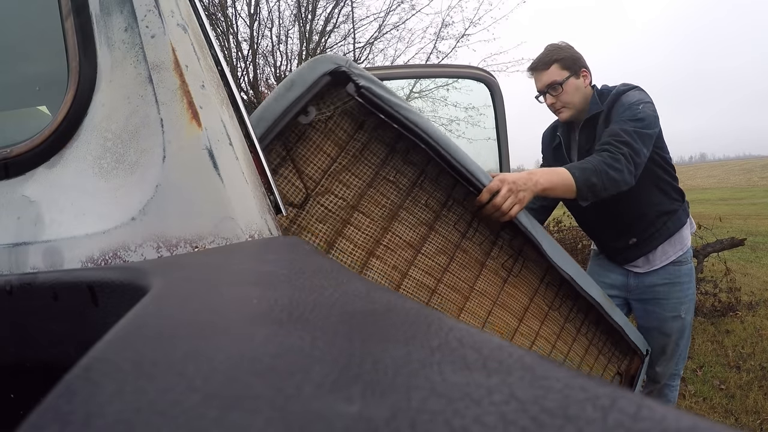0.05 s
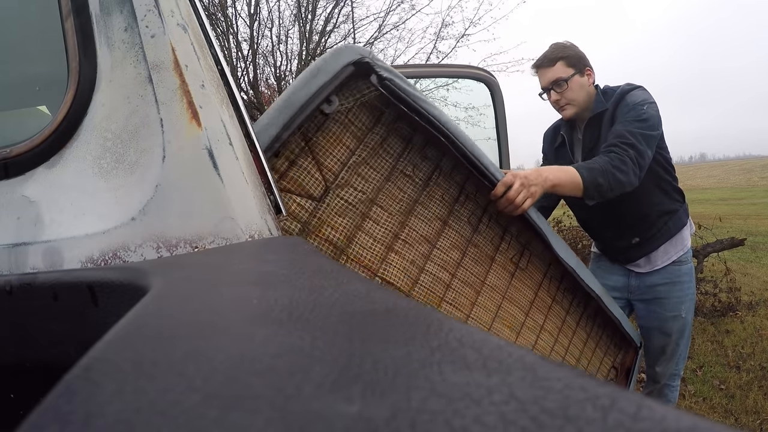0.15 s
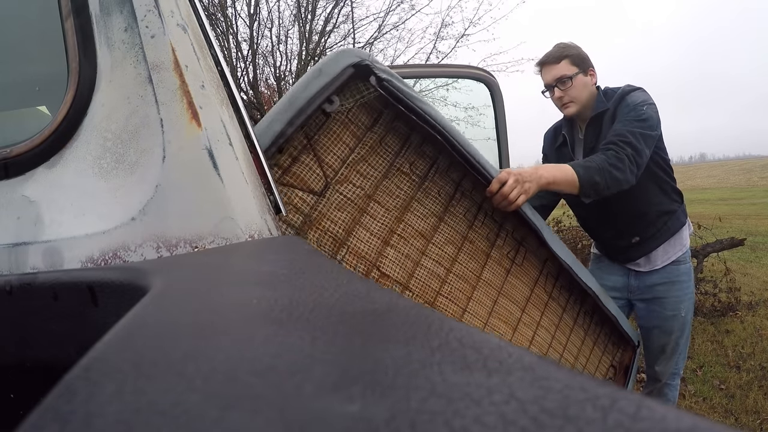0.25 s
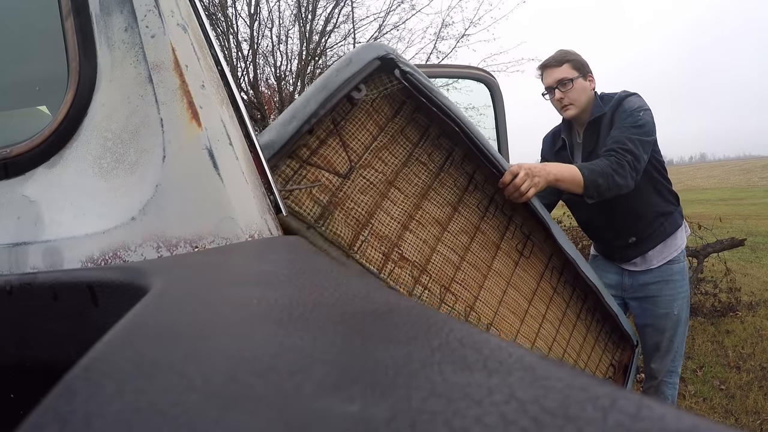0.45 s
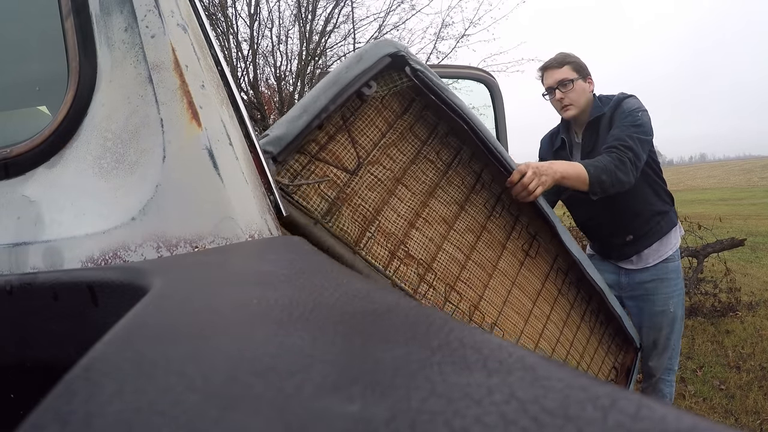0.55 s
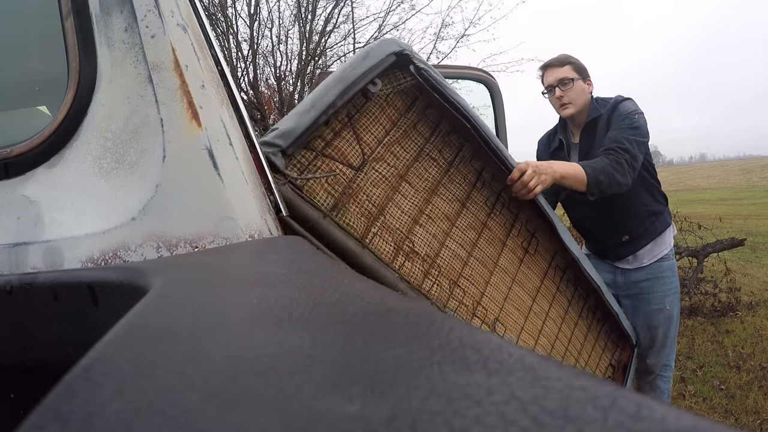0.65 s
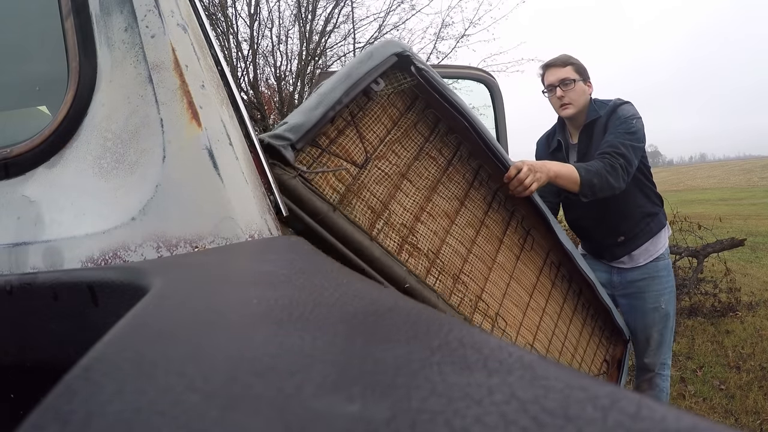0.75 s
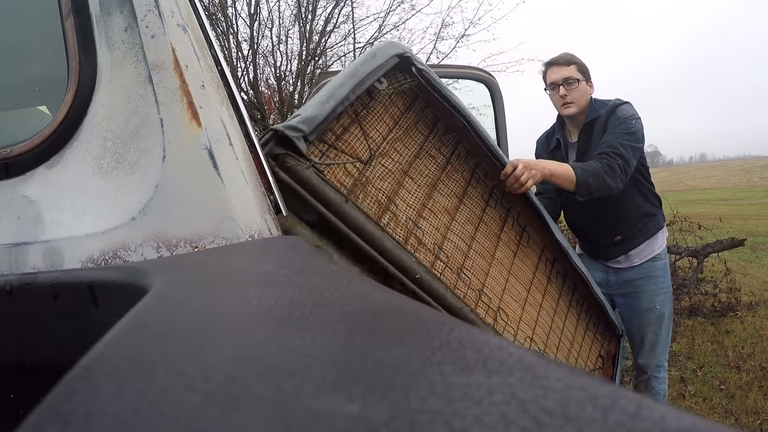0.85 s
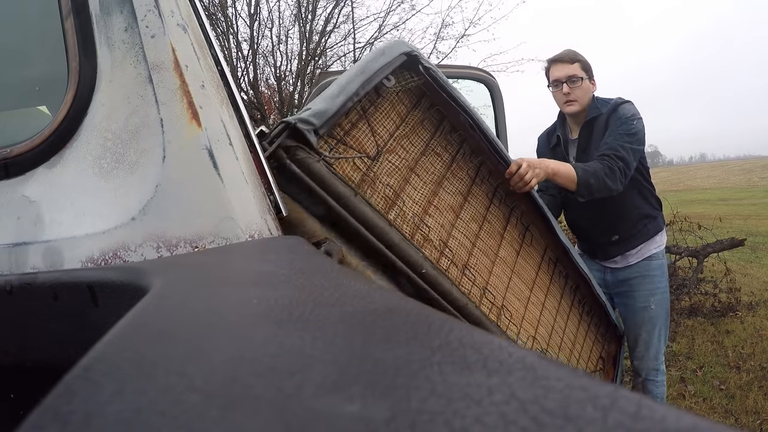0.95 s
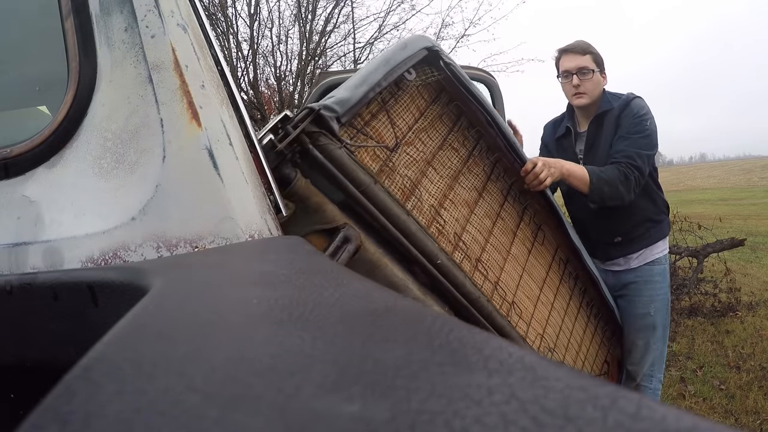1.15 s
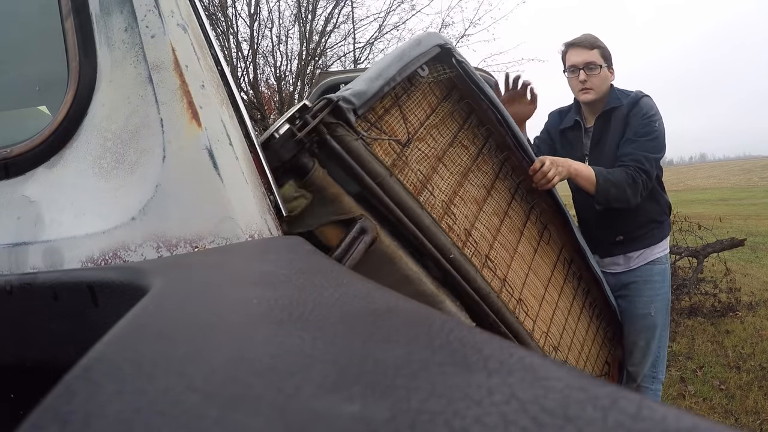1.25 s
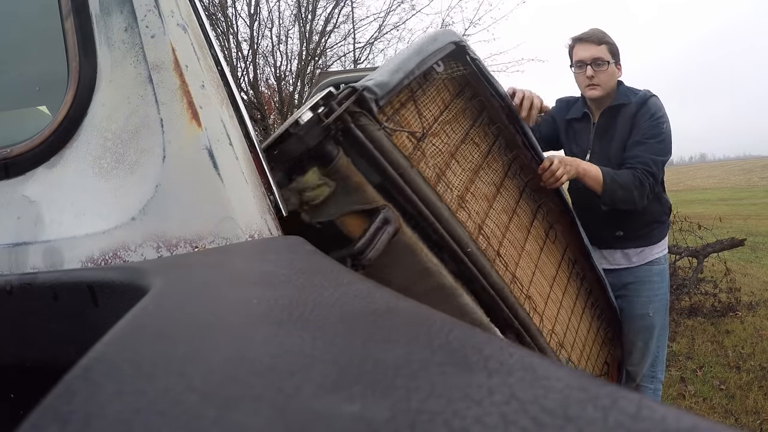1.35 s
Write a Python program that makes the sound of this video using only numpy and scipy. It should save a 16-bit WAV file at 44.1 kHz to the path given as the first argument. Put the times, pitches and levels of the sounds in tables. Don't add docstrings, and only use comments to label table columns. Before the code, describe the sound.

A heavy seat frame thumps hard onto a steel vehicle sill, then knocks and rattles loosely

```python
import sys
import numpy as np
from scipy import signal
from scipy.fft import rfft, irfft
from scipy.io import wavfile
from scipy.ndimage import uniform_filter1d

SR = 44100
rng = np.random.default_rng(int(sys.argv[2]) if len(sys.argv) > 2 else 0)


def dump_mix(stems):
    frames = np.atleast_2d(stems).T
    limited = np.clip(frames, -1, 1)
    pcm = np.round(limited * 32767).astype(np.int16)
    wavfile.write(sys.argv[1], SR, pcm)


def invert_db(x):
    u = np.asarray(x, float) / 20
    return 10 ** u


N = 61739

# (frequency [Hz], density [dB per Hz])
HISS_SPECTRUM = [(53, -21), (90, -11.5), (314, -21), (398, -23), (864, -23.5), (1270, -22.5), (1650, -26),
                 (2090, -24), (15500, -41)]
# (time [s], level [dB])
SHAKE_LEVEL = [(0, -40), (.1, -46.5), (.19, -50), (.23, -23), (.36, -24.5), (.47, -29.5), (.6, -25),
               (.69, -27), (.74, -30), (.85, -28.5), (.92, -32.5), (1.0, -32), (1.09, -31), (1.13, -31),
               (1.2, -35.5), (1.4, -39)]
# (frequency [Hz], width [Hz], level [dB])
WOBBLE_MODES = [(25.2, 12, 1.5), (44.3, 34, -4), (61.4, 29, 3), (88, 15, -14)]
# (frequency [Hz], density [dB per Hz])
GROAN_SPECTRUM = [(53, -42), (90, 4), (679, -23), (1090, -31), (1520, -40.5), (3420, -47), (4150, -51.5),
                  (6000, -51), (7800, -103.5), (13200, -120)]
# (peak time [s], rise [s], fall [s], level [dB], centre [Hz])
SCRAPES = [
    (.6, 0.041, 0.029, -48, 1070),
    (1.139, 0.039, 0.021, -55, 3470),
]
# (time [s], level [dB], pitch [Hz], decay t60 [s])
FITTINGS = [(0.066, -56.5, 1780, 0.034), (.345, -51, 10500, 0.025), (.391, -42, 2160, 0.019),
            (.407, -40, 2250, 0.023), (.4105, -40, 1680, 0.019), (0.4203, -37, 2300, 0.013),
            (0.422, -42, 1800, 0.024), (.433, -49, 2400, 0.044), (.44, -43, 1680, 0.03),
            (.449, -60, 1570, 0.034), (.478, -44, 1940, 0.048), (0.487, -37.5, 1560, 0.035),
            (.499, -45, 2110, 0.067), (0.508, -44, 1500, 0.037), (0.518, -43, 2250, 0.031),
            (0.537, -42, 1550, 0.083), (.583, -45, 12500, .04), (0.636, -39, 1120, 0.078),
            (.6515, -49, 9400, .04), (.652, -37.5, 3550, 0.096), (.709, -40, 1140, 0.037),
            (.736, -47, 12200, .03), (0.814, -50, 6000, 0.079), (.822, -51, 12000, .03),
            (.826, -39, 3340, 0.028), (0.907, -58, 1920, 0.036), (0.941, -40, 4300, .06),
            (.978, -55, 4800, 0.038), (.998, -32, 380, 0.033), (.7025, -44, 2870, 0.034)]
# (time [s], level [dB], colour [Hz], decay t60 [s], brightness [dB per octave])
METAL_CRACKS = [(.0024, -40, 5400, 0.029, 13.5), (.345, -45, 6000, 0.045, -4), (0.407, -49, 2300, 0.052, 5),
                (.420, -52, 2320, 0.056, 7), (0.436, -43.5, 1610, 0.069, 0.5),
                (.478, -49.5, 1540, 0.32, 1.5), (0.498, -55, 2210, 0.11, 6), (0.535, -49, 1410, 0.53, -1),
                (0.5648, -32.5, 1670, 0.079, -1), (0.583, -34.5, 2520, 0.13, 0),
                (0.603, -42.5, 2360, 0.34, -3), (0.631, -40, 3300, 0.13, 2), (0.6519, -46, 3400, 0.19, 10),
                (0.7068, -49, 2280, 0.2, 2), (0.7351, -44, 5860, 0.15, 3.5), (0.821, -38, 2420, 0.18, 1),
                (.835, -45, 3220, 0.068, -15), (.942, -35, 4290, 0.12, 6), (0.957, -38, 2170, 0.19, 2),
                (0.9756, -33, 2220, 0.16, 1), (1.001, -48, 1510, 0.43, -7), (1.056, -51, 1850, 0.27, -3.5),
                (1.108, -56, 1520, .1, 7), (1.1462, -42, 937, 0.04, -2)]
# (time [s], level [dB], colour [Hz])
LOOSE_CLACKS = [
    (0.208, -17, 2620),
    (0.213, -39, 2390),
    (0.2208, -20, 2860),
    (0.2391, -42, 2980),
    (0.245, -29.5, 11000),
    (.265, -10.5, 3180),
    (0.2692, -29.5, 10900),
    (0.285, -29, 7800),
    (0.304, -29, 10900),
    (0.305, -21.5, 5750),
]
# (time [s], level [dB], strongest pitch [Hz], contact [s])
DULL_BLOWS = [(.312, -21.5, 226, 0.035), (0.337, -23.5, 300, 0.004), (0.411, -32.5, 246, 0.018),
              (0.445, -29, 247, 0.012), (0.487, -37.5, 483, 0.04), (0.535, -28, 398, 0.06),
              (0.568, -21, 300, 0.046), (0.586, -28.5, 614, 0.027), (0.605, -22, 300, 0.041),
              (.632, -47, 484, 0.023), (0.704, -36.5, 367, 0.042), (0.739, -42, 690, 0.078),
              (0.82, -29.5, 353, 0.038), (.943, -19, 660, 0.014), (.955, -19.5, 640, 0.014),
              (.96, -21.5, 225, 0.032), (0.996, -31.5, 225, 0.04), (1.0, -31.5, 715, 0.0067)]
# (time [s], level [dB])
RATTLE_LEVEL = [(.203, -46), (.208, -25), (.225, -20.5), (.25, -24.5), (.265, -29.5), (.304, -31),
                (.312, -35), (.35, -43), (.39, -69)]
# (frequency [Hz], density [dB per Hz])
RATTLE_SPECTRUM = [(180, -4), (300, 2), (461, -12.5), (781, -6), (1220, -9.5), (1490, -6.5), (3130, -15.5),
                   (11000, -41.5), (15500, -53)]
# (frequency [Hz], density [dB per Hz])
CRACK_SPECTRUM = [(400, 6.5), (900, -0.5), (1700, -0.5), (3000, -7), (5000, -14.5), (8000, -28.5),
                  (12500, -44.5), (15600, -48)]
# (frequency [Hz], level [dB], decay t60 [s])
FRAME_MODES = [(273, -8, 0.23), (361, 1, 0.28), (794.5, 2, 0.31), (1055, -2, 0.4), (1446, -12, .35),
               (1525, -7, 0.39), (1892, -5.5, 0.15), (2246, -8, .3), (2820, -10, 0.18)]
# (frequency [Hz], level [dB], decay t60 [s])
PANEL_MODES = [(159.4, -6.5, 0.27), (225, 0, 0.1), (225, 0.5, 0.18), (300, -34.5, 0.48), (387.5, -7, 0.09),
               (500, -9, 0.033), (622, -4.5, 0.04), (686.3, 5, .11), (842, -12, 0.3), (977.4, -2.5, 0.18),
               (1110, -3, 0.1), (1296, -17, 0.11), (1810, -31, 0.09), (2050, -33, 0.14)]
# (time [s], level [dB], frequency [Hz], decay t60 [s], rise [s])
SHELL_SWINGS = [(0.2079, -8, 65.26, 0.46, 0.022), (0.2141, 4.4, 36.4, 0.18, 0.019),
                (0.2738, -1, 53.3, 0.089, 0.023), (0.3102, -17.5, 85.6, 0.37, 0.025),
                (0.349, -28.5, 87.6, 0.58, 0.008), (0.3553, -17.5, 39.3, 0.39, 0.0074),
                (0.435, -11, 67, 0.29, 0.078), (0.4398, -17.5, 33.7, 0.86, 0.096),
                (0.5285, -20, 71.2, 0.42, 0.0045), (0.5388, -24.5, 37.5, 0.33, 0.018),
                (0.5777, -22, 83.5, 0.45, 0.0041), (0.602, 4, 53.1, 0.17, 0.08),
                (0.6502, -13, 90, 0.14, 0.038), (0.7072, -21, 85.7, 0.45, 0.079),
                (0.7823, -39, 30.8, 0.4, 0.008), (0.783, -16.5, 55.5, 0.5, 0.08),
                (0.838, -19.5, 65.2, 0.4, 0.04), (0.8914, -29, 50.6, 0.29, 0.0093),
                (0.919, -16.5, 67.5, 0.3, 0.073), (0.9487, -14.5, 35.2, 0.38, 0.025),
                (1.0111, -8, 55.5, 0.28, 0.068), (1.08, -23, 62.1, 0.39, 0.02),
                (1.1652, -17, 86.1, 0.12, 0.057), (1.2169, -22.5, 62.5, 0.35, 0.064),
                (1.232, -29, 31.2, 0.75, 0.11), (1.2872, -27.5, 54.5, 0.36, 0.092)]
# (time [s], level [dB], strongest pitch [Hz])
LANDINGS = [
    (0.2034, -13, 770),
    (.208, -1.5, 500),
    (.2126, -13, 620),
    (.2172, -19.5, 600),
    (0.2212, -10.5, 300),
    (0.9435, -29, 800),
    (1.1458, -43.5, 1000),
]


def evened(x):
    return x / np.sqrt(np.mean(x ** 2) + 1e-20)


def curve(rows, outside_db):
    s, db = np.transpose(rows)
    return np.interp(np.arange(N) / SR, s, db, outside_db, outside_db)


def colour(x, points):
    f, db = np.transpose(points)
    hz = np.fft.rfftfreq(len(x), 1 / SR) + 1
    gain = invert_db(np.interp(np.log(hz), np.log(f), db, -70, -70))
    return irfft(rfft(x) * gain, len(x))


def add(mix, s, sound):
    part = mix[round(s * SR):][:len(sound)]
    part += sound[:len(part)]


def resonate(x, hz, width_hz):
    r = np.exp(-np.pi * width_hz / SR)
    return 2 * signal.lfilter([1 - r], [1, -r * np.exp(2j * np.pi * hz / SR)], x).real


def resonate_twice(x, hz, width_hz):
    return resonate(resonate(x, hz, width_hz), hz, width_hz)


def roughness(swing_db, samples):
    noise = rng.standard_normal(N)
    return invert_db(swing_db * evened(uniform_filter1d(noise, samples)))


def frame(force):
    t = np.arange(int(.5 * SR)) / SR
    ring = sum(invert_db(db - 60 * t / t60) * np.sin(2 * np.pi * hz * t) for hz, db, t60 in FRAME_MODES)
    return signal.fftconvolve(force, ring)[:N]


def panel(force, shorten, centre_hz, width_oct, detune=0):
    t = np.arange(int(.4 * SR)) / SR
    ring = np.zeros(len(t))
    shift = 1 + detune * rng.standard_normal(len(PANEL_MODES))
    for (hz, db, t60), k in zip(PANEL_MODES, shift):
        coupling_db = -4.4 * (np.log2(hz / centre_hz) / width_oct) ** 2
        decay_db = -60 * t / (t60 * shorten)
        ring += invert_db(db + coupling_db + decay_db) * np.sin(2 * np.pi * hz * k * t)
    return signal.fftconvolve(force, ring)


def hiss():
    duck_db, recover_s = -8, 0.42
    t = np.arange(N) / SR - LANDINGS[0][0]
    gain_db = duck_db * (t > 0) * np.exp(-(np.abs(t) / recover_s) ** 2)
    return invert_db(-59.5 + gain_db) * evened(colour(rng.standard_normal(N), HISS_SPECTRUM))


def shaking():
    rest_db, wobble_follow = -52.5, 0.57
    groan_db, groan_follow = -44.5, 1.795
    level_db = curve(SHAKE_LEVEL, -50)
    low = np.zeros(N)
    for hz, width_hz, db in WOBBLE_MODES:
        low += invert_db(db) * evened(resonate_twice(rng.standard_normal(N), hz, width_hz))
    groan = evened(colour(rng.standard_normal(N) * roughness(1, 500), GROAN_SPECTRUM))
    wobble = invert_db(rest_db + wobble_follow * (level_db - rest_db)) * evened(low)
    return wobble + invert_db(groan_db + groan_follow * (level_db + 33.5)) * groan


def brush():
    out = np.zeros(N)
    for s, rise_s, fall_s, db, hz in SCRAPES:
        t = np.arange(N) / SR - s
        swell = np.exp(-np.where(t < 0, -t / rise_s, t / fall_s))
        fuzz = rng.standard_normal(N) * roughness(1.7, 90)
        out += invert_db(db) * swell * evened(resonate(resonate(fuzz, hz, 1.2 * hz), hz, 3 * hz))
    return out


def sizzle():
    start_s, end_s, fade_s, hz = .206, 0.3004, 0.0086, 5360
    t = np.arange(N) / SR
    gate = (t > start_s) * np.exp(-np.maximum(t - end_s, 0) / fade_s)
    grit = rng.standard_normal(N) * roughness(2.5, 120)
    return invert_db(-43.5) * gate * evened(resonate(grit, hz, .9 * hz))


def clatter():
    out, t = np.zeros(N), np.arange(int(.1 * SR)) / SR
    for s, db, hz, t60 in FITTINGS:
        noise = rng.standard_normal(len(t))
        force = 10 * (t == 0) + noise * invert_db(-60 * t / t60)
        puff = resonate_twice(force, hz, 0.2 * hz)
        add(out, s, invert_db(db) * puff / np.abs(puff).max())
    return out


def crack(hz, t60, tilt_db, ring_db, width):
    t = np.arange(int(.25 * SR)) / SR
    noise = rng.standard_normal((3, len(t)))
    tone = [(f, db + tilt_db * np.log2(f / 2000)) for f, db in CRACK_SPECTRUM]
    broad = evened(colour(noise[0], tone))
    ring = invert_db(ring_db) * evened(resonate_twice(noise[1], hz, width * hz))
    chatter = invert_db(2.2 * evened(uniform_filter1d(noise[2], 70)))
    snap = (broad + ring) * invert_db(-60 * t / (.36 * t60)) * chatter
    dull = resonate(broad, 1600, 3760) + 0.12 * ring
    tail = dull * invert_db(-5.5 - 60 * t / t60) * np.minimum(t / 0.0098, 1) * chatter
    return np.minimum(t / 0.00034, 1) * (snap + tail)


def cracks():
    out = np.zeros(N)
    for s, db, hz, t60, tilt_db in METAL_CRACKS:
        add(out, s, invert_db(db) * crack(hz, t60, tilt_db, -3, .12))
    for s, db, hz in LOOSE_CLACKS:
        add(out, s, invert_db(db - 2.5) * crack(hz, 0.02, 1.0, 0.49, 0.14))
    return out


def blows():
    out, t = np.zeros(N), np.arange(int(.2 * SR)) / SR
    for s, db, hz, contact_s in DULL_BLOWS:
        noise = rng.standard_normal((2, len(t)))
        ring = panel(noise[0] * invert_db(-30 * t / contact_s), 1, hz, 0.34, 0.0408)
        thud = evened(resonate(resonate(noise[1], hz, 1.4 * hz), hz, 4.6 * hz))
        thud = thud * invert_db(-8.5 - 15 * t / contact_s)
        add(out, s, invert_db(db) * ring / np.abs(ring).max())
        add(out, s, invert_db(db + 0.5) * np.minimum(t / 0.0057, 1) * thud)
    return out


def rattle():
    hits_per_s, spread_db = 5000, 2.8
    struck = rng.random(N) < hits_per_s / SR
    hits = struck * invert_db(spread_db * np.minimum(rng.exponential(1, N), 4))
    grain = rng.standard_normal(N) * np.sqrt(np.abs(uniform_filter1d(hits ** 2, 60)) + 0.31)
    level = invert_db(curve(RATTLE_LEVEL, -90) + 5.5)
    force = level * evened(grain)
    direct = level * evened(colour(grain, RATTLE_SPECTRUM))
    panels = panel(force, 0.34, 790, 5.4, 0.011)[:N]
    return direct + invert_db(-30) * panels + invert_db(-43) * frame(force)


def shell_swing():
    out, t = np.zeros(N), np.arange(int(.5 * SR)) / SR
    for s, db, hz, t60, rise_s in SHELL_SWINGS:
        envelope = invert_db(db - 60 * t / t60) * np.minimum(t / rise_s, 1)
        add(out, s, -envelope * np.sin(2 * np.pi * hz * t))
    return out


def landing():
    contact_s = 0.00096
    push = np.sin(np.pi * np.arange(0, 1, 1 / (SR * contact_s))) ** 2
    push /= push.sum()
    out = np.zeros(N)
    for s, db, hz in LANDINGS:
        add(out, s, invert_db(db) * panel(push, 0.28, hz, 1.23))
    return out


def scene():
    impacts = landing() + shell_swing() + cracks() + blows()
    loose_parts = clatter() + rattle()
    return (impacts + loose_parts + shaking() + brush() + hiss() + sizzle())[None]


def band_limit(x):
    return signal.sosfilt(signal.butter(12, 15920, fs=SR, output="sos"), x)


def record(dry):
    soft = 0.94 * np.tanh(np.abs(dry / 0.98) ** 2.485) ** (1 / 2.519) * np.sign(dry)
    low_pass = signal.firwin(511, 15700, window=("kaiser", 9), fs=SR)
    mix = signal.oaconvolve(soft, low_pass[None], "same")
    return band_limit(mix)


dry = scene()
out = record(dry)
dump_mix(out)
```